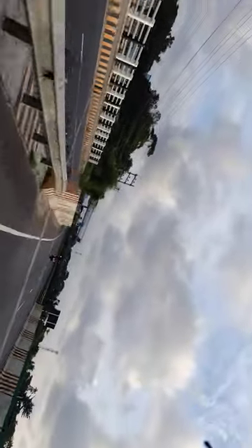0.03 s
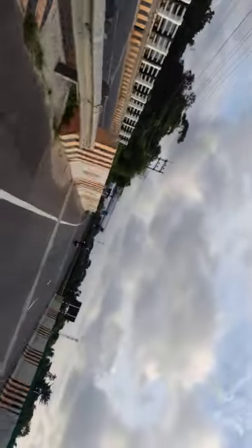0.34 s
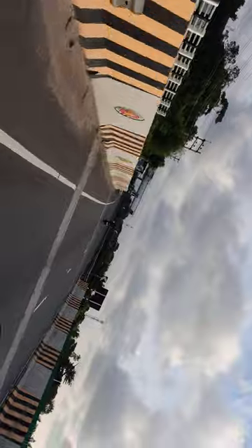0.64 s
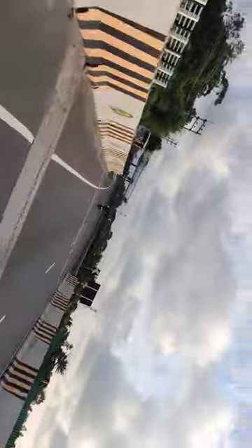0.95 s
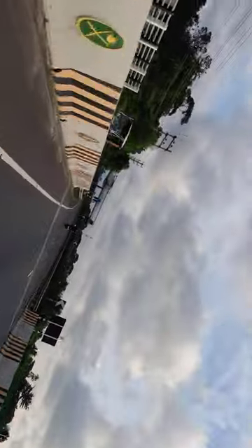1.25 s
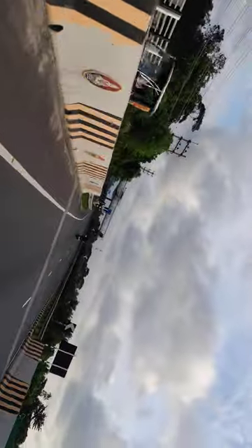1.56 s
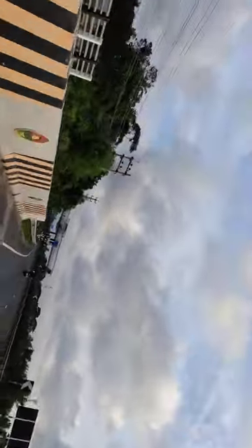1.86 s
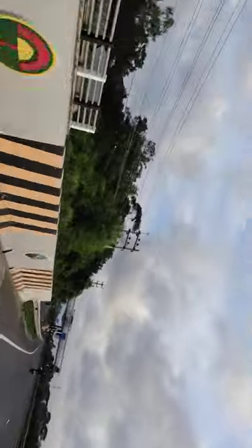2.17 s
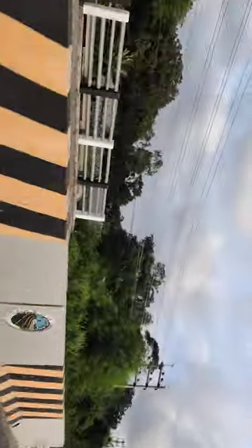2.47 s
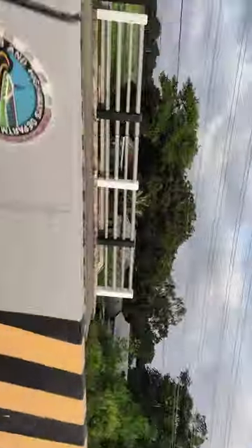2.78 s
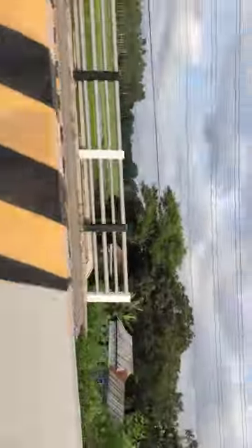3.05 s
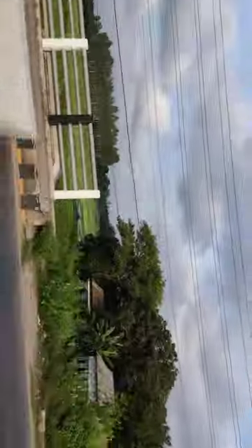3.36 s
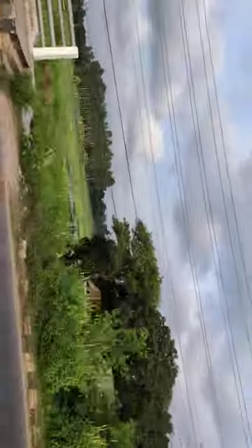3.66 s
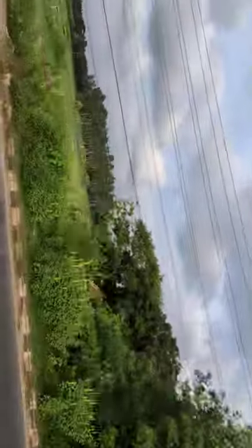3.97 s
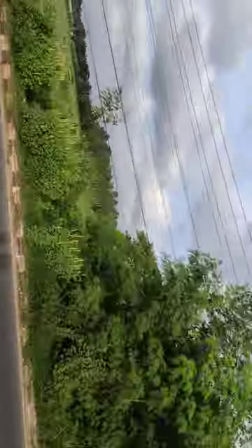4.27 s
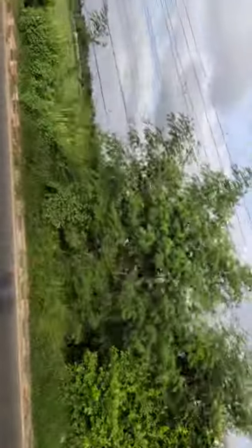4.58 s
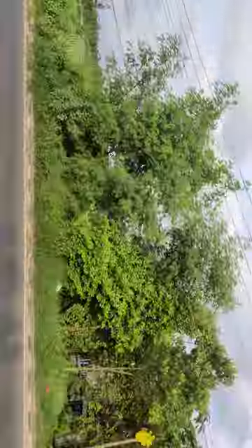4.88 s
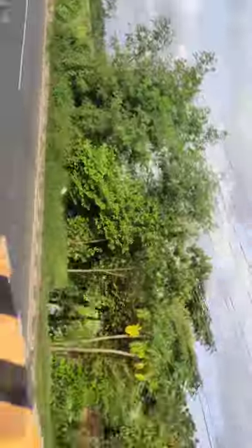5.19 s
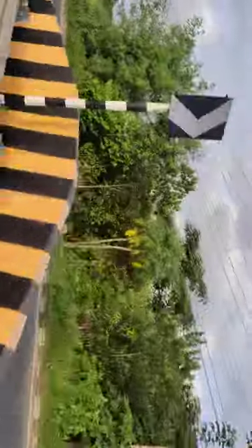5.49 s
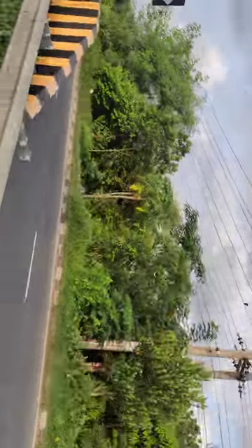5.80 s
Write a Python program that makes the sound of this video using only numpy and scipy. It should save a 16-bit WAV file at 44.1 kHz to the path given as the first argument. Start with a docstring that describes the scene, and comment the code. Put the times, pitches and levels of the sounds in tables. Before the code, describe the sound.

Wind buffets a microphone held out of a vehicle moving along a highway. A steady tyre roar and faint, high whines run underneath for the whole six seconds. From the start, uneven gusts thump and slap, mostly on the right. From about 1.7 seconds they grow into a loud, rasping flutter, peaking around 2.5 seconds with overloaded crackle and sizzling hiss. At about 2.7 seconds the right side drops away suddenly, leaving a softer wind rumble and the road noise. From about 4.3 seconds the wind builds again, now on the left, with rushing air and scattered slaps, and is heaviest and most distorted between 5.2 and 5.5 seconds. From about 5.1 seconds to the end, air also hisses on the right, with tiny, high whistling squeaks, while the buffeting carries on.

```python
"""Wind buffets a phone held out of a vehicle on a highway, hitting the microphone port at each end on its own.
Large eddies thump, small ones rush, and the flow tears off in slaps; overload makes it a rasping flutter.
Air grazing the right port hisses and whistles. Tyre roar and thin whines roll on underneath,
and gain control turns the loud stretches down."""
import sys
import numpy as np
from scipy import signal
from scipy.fft import rfft, irfft, next_fast_len
from scipy.io import wavfile

SR = 44100
rng = np.random.default_rng(int(sys.argv[2]) if len(sys.argv) > 2 else 0)


def materialize(psi):
    """Save the field psi as 16-bit PCM at rate SR to the path in sys.argv[1].

    A 1-D psi becomes a single channel; in a 2-D psi each row is a channel.
    """
    bounded = np.clip(np.atleast_2d(psi).T, -1, 1)
    quanta = np.round(bounded * 32767).astype(np.int16)
    wavfile.write(sys.argv[1], SR, quanta)


N = 265923


def undb(db):
    """Decibels to gain."""
    return np.exp(np.asarray(db) * (np.log(10) / 20))


def curves(table):
    """One envelope per column of a timed table, in straight ramps."""
    times, *columns = np.transpose(table)
    return [np.interp(np.arange(N) / SR, times, column) for column in columns]


def bins():
    """Frequencies of the filter grid in Hz."""
    return np.maximum(np.fft.rfftfreq(next_fast_len(N, True), 1 / SR), 1)


def response(points):
    """EQ curve on the filter grid from (frequency [Hz], level [dB]) points."""
    hz, db = np.transpose(points)
    return undb(np.interp(np.log(bins()), np.log(hz), db))


def filtered(x, gain):
    """Sound through an EQ curve."""
    size = next_fast_len(N, True)
    return irfft(rfft(x, size) * gain, size)[..., :N]


def noise(gain):
    """Noise of rms 1, coloured by an EQ curve."""
    x = irfft(rng.standard_normal(2 * len(gain)).view(complex) * gain)[:N]
    return x / x.std()


def flicker(hz):
    """Random modulation of rms 1, up to about hz and without slow drift."""
    ratio = bins() / hz
    return noise(ratio / (ratio + 0.19) / (1 + ratio ** 4))


def airy_tone(hz, width_hz):
    """A narrow band of noise that follows a pitch curve."""
    phase = 2 * np.pi * np.cumsum(hz) / SR
    blur = 1 / (1 + (bins() / width_hz) ** 2)
    return noise(blur) * np.cos(phase) + noise(blur) * np.sin(phase)


def vehicle(levels, waver_db=2.0):
    """The bed: tyre roar on asphalt and a few high, noisy whines at a steady speed."""
    # spectrum of the rolling tyres: (frequency [Hz], level [dB])
    rolling = [(40, -4.5), (150, 0.5), (500, -14), (1000, -31), (1800, -23), (3300, -27.5), (4800, -29),
               (6300, -25.5), (7400, -26), (10000, -35.5), (13000, -37), (16000, -28.5)]
    # whines of the moving vehicle: (pitch [Hz], nominal width [Hz], level [dB])
    whines = [(2570, 55, 0), (2676, 110, -1), (3000, 120, -4.5), (3940, 83, -5.5), (5310, 230, -5)]
    roar_db, whine_db = curves(levels)
    whine = sum(undb(db) * airy_tone(np.full(N, hz), 0.98 * width) for hz, width, db in whines)
    roar = undb(roar_db) * noise(response(rolling))
    return roar + undb(whine_db + waver_db * flicker(hz=20)) * whine


def whistle(wobble=0.017, lower_ratio=.77, lower_db=-15, rasp_db=-8, tone_db=-5, flutter_db=3.5):
    """The stream flaps at the port's edge: abrupt, gliding squeaks with an octave and a weak lower mode."""
    # squeaks: (start [s], length [s], first pitch [Hz], last pitch [Hz], level [dB], relative octave [dB])
    chirps = [(5.214, .009, 4900, 5600, -23, -24), (5.22, .012, 7000, 6850, -21, -18),
              (5.231, 0.021, 7300, 6450, -22, -18), (5.26, 0.0148, 5400, 5720, -27, -18),
              (5.277, .03, 5640, 4950, -34, -18), (5.321, 0.037, 5650, 5050, -27.5, -14),
              (5.334, .009, 6500, 6880, -25, -16), (5.364, 0.019, 6200, 5850, -19.5, -15),
              (5.382, .022, 5450, 4850, -29, -19.5), (5.463, .009, 5550, 5790, -27, -6),
              (5.485, .011, 6150, 5770, -28, -5), (5.518, .019, 6350, 6080, -26.5, -3),
              (5.638, .007, 5580, 5480, -29, -20), (5.759, 0.018, 4780, 4496, -28, -22),
              (5.86, 0.0088, 6400, 6070, -23, -2), (5.876, 0.012, 6050, 5720, -24, -10),
              (5.89, 0.013, 5920, 6550, -21.5, -5), (5.946, 0.0084, 5430, 5800, -23.5, -11),
              (5.954, .012, 5750, 5200, -34, -18.5), (5.97, 0.029, 5150, 5450, -31.5, -22),
              (6.008, 0.0223, 5270, 4950, -36, -22)]
    edge_s = 0.0054  # fade in and out
    t = np.arange(N) / SR
    gain, octave_gain, hz = np.zeros((3, N))
    for start, length, first_hz, last_hz, db, octave_db in chirps:
        end = start + length
        envelope = undb(db) * np.clip(np.minimum(t - start, end - t) / edge_s + 1 / 2, 0, 1)
        leads = envelope > gain  # the strongest stream sets the pitch
        hz[leads] = np.interp(t[leads], [start, end], [first_hz, last_hz])
        gain[leads], octave_gain[leads] = envelope[leads], undb(octave_db)
    hz = hz * (1 + wobble * flicker(hz=200))
    phase = 2 * np.pi * np.cumsum(hz) / SR
    tone = np.sqrt(2) * (np.sin(phase) + undb(lower_db) * np.sin(lower_ratio * phase))
    tone += octave_gain * airy_tone(2 * hz, width_hz=500)
    rasp = airy_tone(hz, width_hz=1200)  # turbulence puts a noisy skirt round the tone
    return (undb(tone_db) * tone + undb(rasp_db) * rasp) * gain * undb(flutter_db * flicker(hz=140))


def graze(attack_s=0.0021, release_s=0.032, flutter_db=2.7, spit_db=4.5, spit_onset_db=-36):
    """Thin streams of air cross the port, hissing unevenly; the fast ones spit and sizzle."""
    # grazing streams: (start [s], hold [s], hiss [dB], sizzle [dB])
    streams = [(0.97, 0.031, -35, -33), (1.886, 0.035, -23, -31), (2.092, 0.02, -25, -33),
               (2.38, 0.018, -19.5, -28), (2.463, 0.017, -17.5, -27), (2.492, 0.093, -23.5, -24),
               (5.092, .05, -27, -55), (5.138, 0.065, -19, -57), (5.228, 0.14, -25.5, -37),
               (5.407, .06, -26.5, -58), (5.455, 0.2, -27.5, -44), (5.713, 0.11, -25.5, -50),
               (5.855, 0.055, -31, -39), (5.933, 0.17, -33.5, -49)]
    # spectrum of the hiss: (frequency [Hz], level [dB])
    jet = [(200, -47), (600, -7), (1200, 5), (2200, 3.5), (3600, -3), (5000, -5.5), (6500, -6.5),
           (9000, -18), (16000, -54)]
    t = np.arange(N) / SR
    hiss_gain, sizzle_gain = 0, 0
    for start, hold, hiss_db, sizzle_db in streams:
        fade = np.maximum((start - t) / attack_s, (t - start - hold) / release_s)
        envelope = np.exp(-np.clip(fade, 0, 20))
        hiss_gain = np.maximum(hiss_gain, undb(hiss_db) * envelope)
        sizzle_gain = np.maximum(sizzle_gain, undb(sizzle_db) * envelope)
    breakup = sizzle_gain / (sizzle_gain + undb(spit_onset_db))
    spits = undb(breakup * spit_db * (flicker(hz=205) - 1 / 2))
    hiss = hiss_gain * noise(response(jet))
    sizzle = sizzle_gain * noise(1 / np.hypot(1, 5000 / bins()))
    return (hiss + sizzle) * spits * undb(flutter_db * flicker(hz=68.6))


def airflow(steady, gusts, rise_share=0.33, buffet_share=0.48):
    """Buffeting and fine-eddy levels in dB: gusts rise fast, fall slower and lift the fine eddies most."""
    t = np.arange(N) / SR
    buffet_db, eddy_db = curves(steady)
    lift_db = 0
    for peak, length, db in gusts:
        start = peak - rise_share * length
        lift_db += np.interp(t, [start, peak, start + length], [0, db, 0])
    return buffet_db + buffet_share * lift_db, eddy_db + lift_db


def buffeting(flutter, wobble=.3, uneven_db=2):
    """Pressure of the large eddies, rms near 1: a random heave, part of which locks into a loose rhythm."""
    # spectrum of the heave: (frequency [Hz], level [dB])
    rumble = [(8, -4), (18, -3.5), (33, 2), (60, 1), (110, -6.5), (170, -9.5), (260, -15), (400, -23.5),
              (700, -37), (1500, -71.5)]
    hz, share = curves(flutter)
    phase = 2 * np.pi * np.cumsum(hz * np.exp(wobble * flicker(hz=60.84))) / SR
    swing = np.sqrt(2) * np.sin(phase) * undb(uneven_db * flicker(hz=29))
    return np.sqrt(1 - share) * noise(response(rumble)) + np.sqrt(share) * swing


def wind(flow, push, swirl_db, waver_db, burst_db, brighten, calm_db, duck_db=1.97):
    """Large eddies push the port; small ones break off them in bursts, brighter the stronger they are."""
    # spectrum of the fine eddies: (frequency [Hz], level [dB])
    rush = [(120, -43), (250, -1), (450, -2), (700, -5.5), (1000, -10), (1500, -16.5), (2200, -25.5),
            (3500, -34.5), (6000, -51)]
    buffet_db, eddy_db = flow
    strength_db = eddy_db + waver_db * flicker(hz=28.5) + burst_db * flicker(hz=166)
    strength_db -= duck_db * (np.abs(push) - 1)  # the rush dips on each peak of the push
    swirl = undb(swirl_db) * noise(response(rush))
    # octave bands tilt around 700 Hz as the strength moves
    octave = np.clip(np.log2(bins() / 700), -2, 3)
    eddies = 0
    for k in range(-2, 4):
        band = filtered(swirl, np.maximum(1 - np.abs(octave - k), 0))
        eddies += band * undb(strength_db + brighten * k * (strength_db - calm_db))
    return push * undb(buffet_db) + eddies


def tear_off(air, slaps, decay_s=0.002, lull=0.53, lull_s=0.0011, thud_db=5, thud_s=0.002):
    """The flow tears off the port: the push collapses, pressure flips with a thud and a spatter follows."""
    t = np.arange(1024) / SR - .005
    after = np.maximum(t, 0)
    hz = np.fft.rfftfreq(len(t), 1 / SR)
    hits, duck = np.zeros(N + len(t)), np.ones(N + len(t))
    for time, db, width_hz in slaps:
        white = rng.standard_normal(len(t))
        spatter = irfft(rfft(white) * hz / (hz + 250) / np.sqrt(1 + (hz / width_hz) ** 5))
        # the brighter the slap, the sooner it is over and the more fully the push collapses
        decay = np.exp(-after / decay_s * (1 + width_hz / 5000))
        depth = min(lull + width_hz / 18000, 1)
        attack = 1 - np.exp(-after * width_hz * 2)
        spatter *= attack * decay
        spatter /= np.sqrt(np.sum(spatter ** 2) / (decay_s * SR))
        thud = -np.sign(air[int(time * SR)]) * np.tanh(np.pi * width_hz * t) * np.exp(-(t / thud_s) ** 2)
        start = int((time + t[0]) * SR)
        span = slice(start, start + len(t))
        hits[span] += undb(db) * (spatter + undb(thud_db) * thud)
        duck[span] *= 1 - depth * np.exp(-(t / lull_s - 1 / 2) ** 2)
    return air * duck[:N] + hits[:N]


def left_wind():
    """Wind on the left port, hitting hardest near the end."""
    # steady flow as the phone turns in the stream: (time [s], buffeting [dB], fine eddies [dB])
    steady = [(0, -17.5, -26.5), (.6, -12, -34), (1.55, -12, -27.5), (1.76, -17.5, -35), (2.2, -8, -26.5),
              (2.7, -12.5, -29.5), (3.8, -14, -29), (4.22, -11.5, -25), (4.32, -14.5, -16.5),
              (4.7, -6.5, -16.5), (4.95, -6, -17.5), (5.22, 2, -10), (5.33, 4.5, -11.5), (5.5, 1.5, -14),
              (5.65, -4.5, -21), (6.03, 0, -19.5)]
    # gusts, negative for a lull: (peak time [s], length [s], fine-eddy lift [dB])
    gusts = [(.01, 0.023, 5), (0.224, 0.21, 6), (0.358, 0.18, -4.5), (0.724, 0.087, 11), (0.96, 0.053, 10),
             (1.204, 0.063, 14), (1.492, 0.11, 6), (1.888, 0.13, 15.5), (2.057, 0.11, 6),
             (2.293, 0.032, 15), (2.493, 0.061, 12), (2.845, 0.08, 7), (2.972, 0.11, 9), (3.167, 0.041, 6),
             (3.935, 0.09, 11), (4.417, 0.05, 3.5), (4.517, 0.017, 8.5), (4.581, 0.13, 4),
             (4.744, 0.061, 9.5), (4.871, 0.029, 8), (5.035, 0.19, 5.5), (5.817, 0.37, 5.5)]
    # eddies shed in step off the phone's end: (time [s], rate [Hz], share of buffeting power [0-1])
    flutter = [(4.2, 170.2, 0.12), (5.05, 150, 0.18), (5.14, 135.3, 0.58), (5.25, 155, 0.6),
               (5.31, 114.9, 0.2), (5.42, 120.1, 0.08)]
    # slaps of air: (time [s], level [dB], bandwidth [Hz])
    slaps = [(.189, -15.5, 835), (1.935, -2.5, 1070), (2.3, -15, 784), (3.927, -20, 895),
             (3.951, -20, 1293), (4.323, -16.5, 2390), (4.51, -8, 1000), (4.52, -6, 1410),
             (4.751, -22, 1377), (4.936, -14, 1318), (5.062, -17, 4500), (5.146, -16, 4500),
             (5.223, -15.5, 7000), (5.482, -21, 8000), (5.558, -12, 6490), (5.574, -27, 6950),
             (5.632, -32, 6500), (5.844, -26.5, 10070), (5.983, -15, 7500)]
    air = wind(airflow(steady, gusts), buffeting(flutter),
               swirl_db=2.5, waver_db=1.1, burst_db=2.13, brighten=0.15, calm_db=-15.5)
    return tear_off(air, slaps)


def right_wind():
    """Wind on the right port, building to a crackling peak and dropping away just before halfway."""
    # steady flow as the phone turns in the stream: (time [s], buffeting [dB], fine eddies [dB])
    steady = [(0, -14, -37), (.6, -10.5, -33), (1.12, -9, -33), (1.7, -0.5, -20), (2.28, -1, -19.5),
              (2.46, 4, -8.5), (2.59, 3.5, -22), (2.68, 7, -20), (2.76, -12.5, -39.5), (4.3, -13, -39),
              (5.15, -8.5, -28.5), (5.5, -6.5, -31.5), (6.03, -10, -35.5)]
    # gusts: (peak time [s], length [s], fine-eddy lift [dB])
    gusts = [(0.121, 0.071, 9.4), (0.226, 0.081, 16.4), (0.301, 0.24, 13.7), (0.459, 0.027, 17),
             (0.722, 0.46, 13), (.838, 0.043, 5.1), (0.955, 0.21, 14.2), (1.22, 0.24, 13),
             (1.433, 0.24, 9.4), (1.615, 0.12, 7.9), (1.78, 0.11, 7.3), (1.902, 0.36, 8.3),
             (2.139, 0.08, 10.6), (2.389, 0.025, 12), (2.827, 0.13, 17), (3.39, 0.34, 7.3),
             (3.47, 0.049, 8.5), (3.72, 0.24, 4.7), (4.91, 0.058, 3.1), (5.141, 0.095, 3.9),
             (5.59, 0.11, 6.3), (5.78, 0.3, 2.1)]
    # eddies shed in step off the phone's end: (time [s], rate [Hz], share of buffeting power [0-1])
    flutter = [(0, 126.4, 0.12), (1.75, 104.1, 0.21), (2.03, 108.8, 0.55), (2.25, 90.4, 0.31),
               (2.38, 150, 0.021), (2.5, 134.6, 0.59), (2.62, 56.74, 0.74), (2.68, 105.7, 0.52),
               (2.76, 100.2, 0.11)]
    # slaps of air: (time [s], level [dB], bandwidth [Hz])
    slaps = [(0.19, -15.5, 900), (.378, -17, 680), (.459, -6, 900), (0.4624, -15, 1200), (.564, -15.5, 700),
             (.619, -10, 796), (0.656, -14, 746), (0.72, -8.5, 890), (0.7214, -20.5, 3500),
             (0.723, -21, 9000), (.803, -8, 650), (0.829, -9, 746), (0.954, -12, 859.6), (1.208, -6.5, 840),
             (1.489, -15, 3400), (1.603, -6.5, 1300), (1.608, -11.5, 1600), (1.754, -8, 860),
             (1.889, -7.5, 1960), (1.914, -13, 2780), (1.964, -9, 2480), (1.975, -12, 2900),
             (2.023, -4, 700), (2.033, -23, 3460), (2.042, -11.5, 1900), (2.057, -26, 2500),
             (2.097, -13.5, 3200), (2.103, -20, 10000), (2.108, -26, 5000), (2.112, -12, 3500),
             (2.1362, -10.5, 9000), (2.14, -22, 5500), (2.1466, -10, 2980), (2.152, -16, 5000),
             (2.301, -0.5, 884), (2.384, -6.5, 3580), (2.391, -14.5, 5000), (2.3955, -21, 4000),
             (2.403, -26, 7000), (2.4105, -13, 6500), (2.421, -16, 8000), (2.4295, -26, 4000),
             (2.4395, -22, 3300), (2.462, -9, 9000), (2.465, -15, 6500), (2.4713, -13, 6000),
             (2.478, -18, 9000), (2.49, -20, 10000), (2.492, -21, 8000), (2.4998, -24, 5500),
             (2.503, -19, 8000), (2.508, -21, 7500), (2.513, -16, 8000), (2.519, -25, 10500),
             (2.522, -11, 7000), (2.524, -13, 6050), (2.5392, -18, 13000), (2.5461, -9, 11000),
             (2.555, -24, 13000), (2.563, -13, 5500), (2.564, -19, 7000), (2.5771, -9.5, 6500),
             (2.5819, -15, 7000), (2.59, -14.5, 15000), (2.597, -29, 4300), (2.604, -29, 4500),
             (2.609, -17, 3200), (2.622, -18.5, 7000), (2.634, -16, 3000), (2.642, -12, 2980),
             (2.658, -19, 3280), (2.668, -18, 4170), (2.69, -31, 4000), (2.833, -8, 690)]
    air = wind(airflow(steady, gusts), buffeting(flutter),
               swirl_db=4.0, waver_db=3.0, burst_db=3.0, brighten=0.16, calm_db=-7.5)
    return tear_off(air, slaps)


def scene(spill_db=-16):
    """Pressure at the two ports: wind over the road bed, with a little of the whistle spilling left."""
    # the vehicle at each port: (time [s], tyre roar [dB], whine [dB])
    left_road = [(0, -31, -53), (1.5, -26, -50.5), (2.6, -28.5, -47), (3.2, -30.5, -49.5), (4.2, -32, -50),
                 (6.03, -30, -44.5)]
    right_road = [(0, -35, -53), (1.5, -29.5, -60), (2.7, -29.5, -52), (3.2, -32, -49.5), (4.4, -27.5, -46),
                  (4.9, -29, -48), (6.03, -32, -62)]
    squeaks = whistle()
    left = vehicle(left_road) + undb(spill_db) * squeaks + left_wind()
    right = vehicle(right_road) + squeaks + graze() + right_wind()
    return np.array([left, right])


def record(dry, memory_s=0.24, squeeze=3.85, leak_db=-20, leak_hz=3500, top_hz=16000):
    """The microphones saturate into rounded flat tops; one slow gain control follows the louder port."""
    # microphone response: (frequency [Hz], gain [dB])
    microphone = [(20, 2), (5000, -2.5), (6400, -7), (7400, -16.5), (9500, -10), (12500, -8),
                  (16000, -16.5)]
    squashed = np.tanh(dry)
    # a little hiss still rides on the flat tops
    squashed += undb(leak_db) * filtered(dry - squashed, 1 / (1 + (leak_hz / bins()) ** 4))
    pole = np.exp(-1 / (memory_s * SR))
    power = signal.lfilter([1 - pole], [1, -pole], squashed ** 2).max(axis=0)
    levelled = filtered(squashed, response(microphone)) / np.sqrt(1 + squeeze * power)
    return signal.sosfilt(signal.ellip(8, .2, 70, top_hz, fs=SR, output="sos"), levelled)


dry = scene()
out = record(dry)
materialize(out)
```